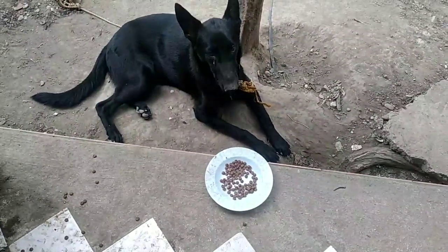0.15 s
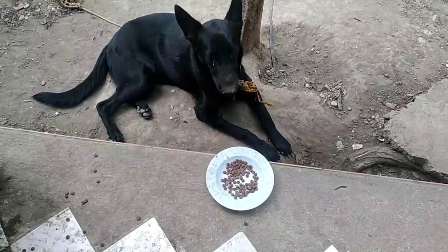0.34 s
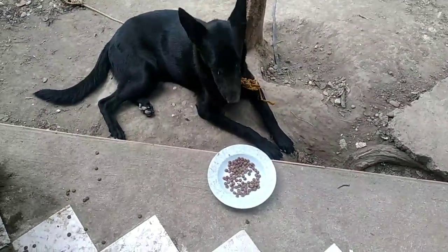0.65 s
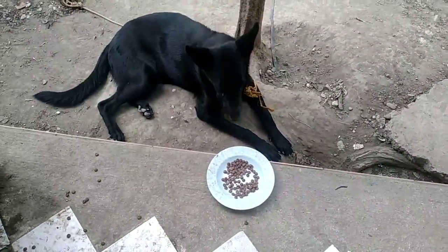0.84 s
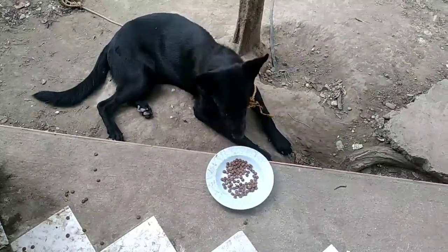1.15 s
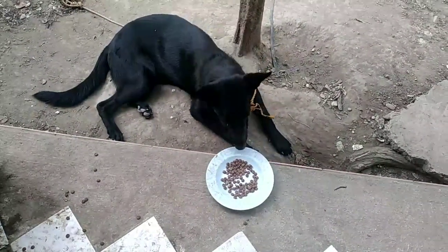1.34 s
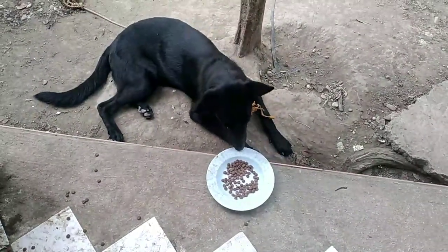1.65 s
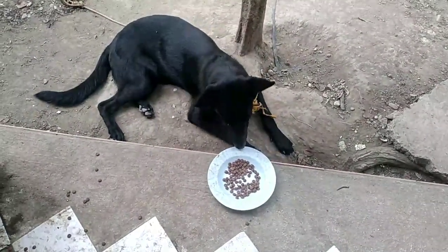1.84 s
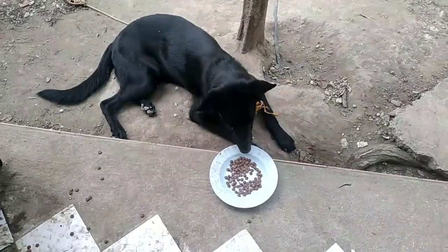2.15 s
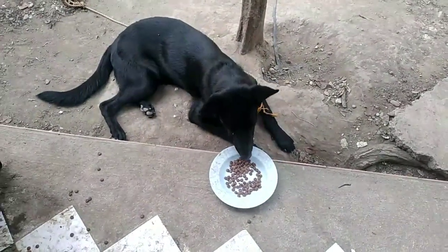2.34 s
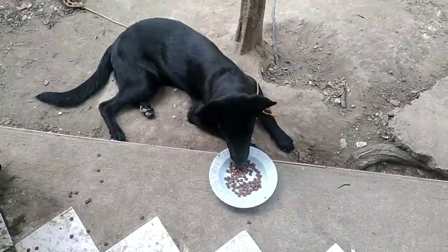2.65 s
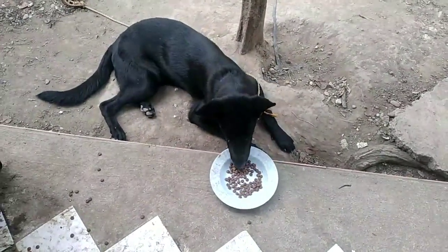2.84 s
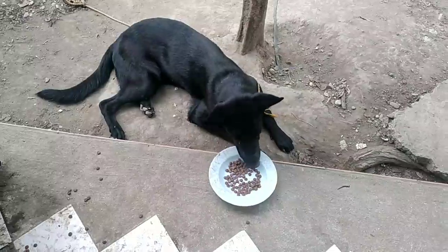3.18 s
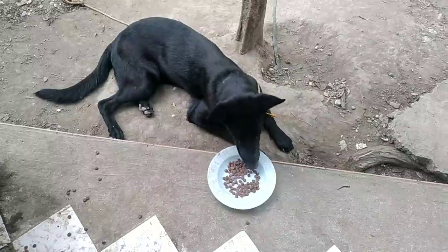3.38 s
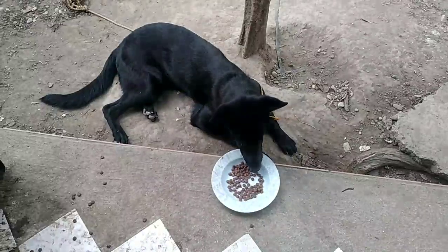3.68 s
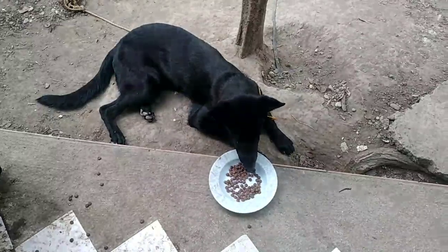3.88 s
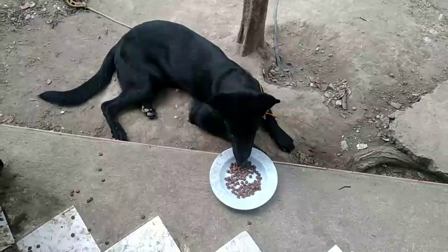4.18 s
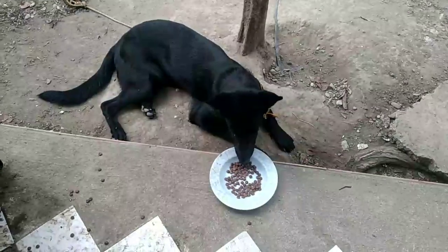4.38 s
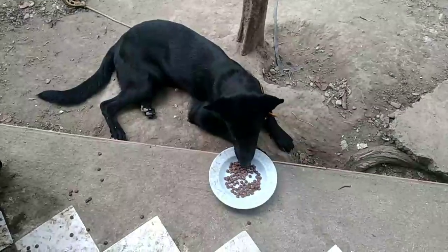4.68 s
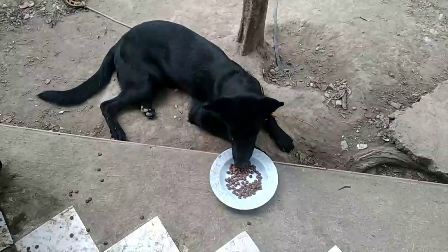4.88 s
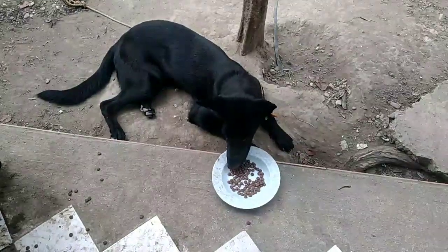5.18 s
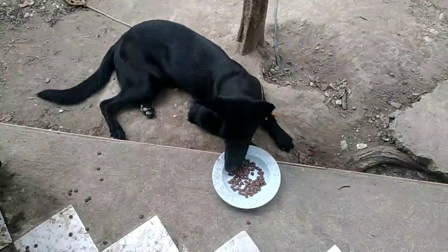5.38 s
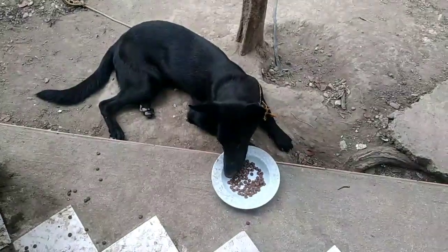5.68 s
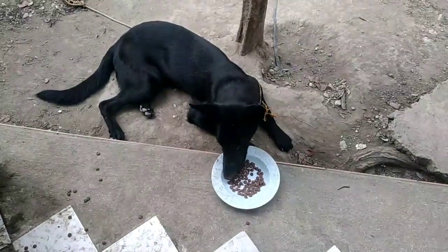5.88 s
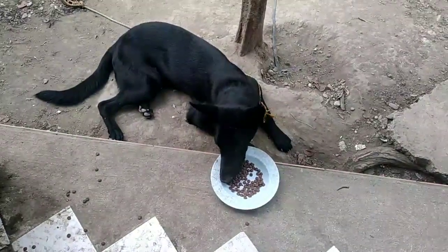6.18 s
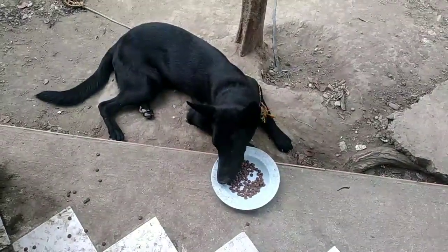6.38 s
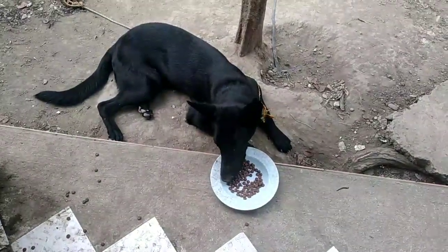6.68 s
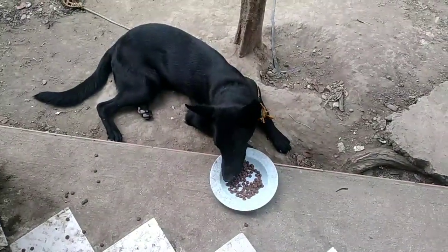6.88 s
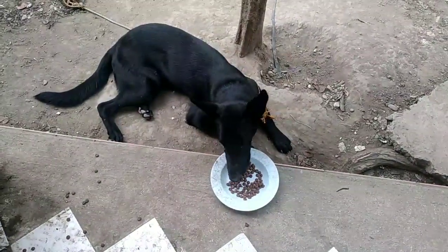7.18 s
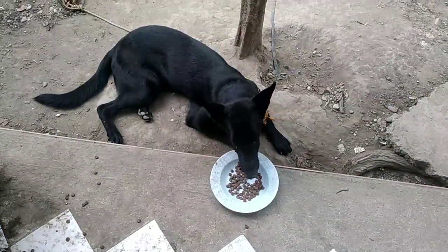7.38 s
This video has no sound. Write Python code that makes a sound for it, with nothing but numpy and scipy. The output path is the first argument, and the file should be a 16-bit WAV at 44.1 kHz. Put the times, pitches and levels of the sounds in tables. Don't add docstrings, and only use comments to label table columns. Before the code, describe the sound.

A dog cracks dry kibble off a thin plate outdoors, sharp crunches in bursts, with collar tinkles, a few bird chirps and faint town rumble.

```python
import sys
import numpy as np
from scipy import signal
from scipy.fft import rfft, irfft
from scipy.io import wavfile
from scipy.ndimage import uniform_filter1d

SR = 44100
rng = np.random.default_rng(int(sys.argv[2]) if len(sys.argv) > 2 else 0)


def voltage_ratio(level):
    return 10 ** (np.asarray(level, float) / 20)


def output_pcm(signal):
    pcm = np.clip(np.atleast_2d(signal).T, -1, 1) * 32767
    wavfile.write(sys.argv[1], SR, np.round(pcm).astype(np.int16))


N = 332073
T = np.arange(N) / SR

# f/Hz, level/dB
TOWN = [(12, -27.5), (20, -22), (30, -9), (43, -2.5), (65, -1.5), (124, -5), (185, -12.5), (209, -18.5),
        (339, -17), (376, -18.5), (464, -26), (505, -26), (889, -27.5), (1500, -36), (2480, -38),
        (3000, -44), (3900, -62), (6600, -120)]
# t/s, level/dB, revs/dB (moved from the deep note to the upper one)
ENGINES = [(0.05, -58, 7.5), (0.69, -54, 1), (1.34, -52.5, -0.5), (1.74, -60.5, 2), (2.29, -52.5, 0.5),
           (2.93, -54, 0), (3.19, -57, 7), (3.33, -56.5, -1), (3.94, -48.5, -1), (4.21, -54, 2),
           (4.55, -54.5, -6), (4.7, -52, 5.5), (5.16, -52.5, -8), (5.6, -55, -0.5), (6.69, -54.5, 0.5),
           (7.34, -57.5, 1), (7.53, -59, -9.5)]
# f/Hz, level/dB
AIR = [(800, 9.5), (2000, -8), (5000, 1.5), (9000, 0), (12000, 12.5), (16500, -5)]
# t/s, length/s, fall/Hz, level/dB, fade over the length/dB
FAR = [(0.028, 0.22, 9, -70.5, 6), (1.58, 0.54, -30, -81, -7), (1.861, 0.34, 130, -72.5, 8),
       (2.343, 0.17, 77, -73, 7), (5.493, 0.33, 56, -78.5, 5), (6.777, 0.032, 20, -60.5, 5),
       (6.807, 0.044, 2, -52.5, 0), (6.884, 0.035, 5, -59, 3), (6.924, 0.047, 5, -65.5, 5),
       (7.024, 0.081, 7, -61, -13), (7.08, 0.065, 30, -70, 9), (7.147, .15, 28, -78, 9),
       (7.353, 0.16, 9.5, -56, 7), (6.81, 0.099, 7, -71, 9), (7.001, 0.1, 5, -70, 3),
       (7.107, 0.032, -10, -56.5, 3), (6.783, 0.018, 5, -64, 3), (7.09, 0.038, 5, -62.5, 7),
       (7.176, .05, 30, -66, 5), (6.85, .03, 5, -64, 3), (6.855, .06, 5, -67, 3)]
FAR_HZ = [1780, 2700, 4520, 7250, 4330, 995, 1427, 1427, 1427, 697, 7800, 4350, 350, 2864, 1430, 700, 1350,
          1330, 745, 1430, 990]
# peak t/s, rise/s, fall/s, level/dB, relative treble/dB
SHUFFLES = [(.19, 0.014, .08, -70.5, 8.5), (1.35, 0.16, 0.12, -67, 10), (2.44, 0.27, 0.049, -67, 7.5),
            (3.288, 0.017, 0.064, -64, 9.5), (4.29, 0.054, .12, -66.5, -2), (4.69, .06, 0.12, -67, -2),
            (4.98, .04, 0.044, -68, 8.5), (5.046, 0.024, 0.059, -68, 10), (5.83, .04, .022, -64.5, -1),
            (5.96, 0.073, 0.11, -64.5, 5.5), (6.134, 0.012, 0.12, -58, 5), (6.699, 0.088, 0.039, -58, 7.5),
            (6.785, 0.14, 0.021, -64.5, 6), (6.994, 0.3, 0.077, -65, 4), (7.085, 0.048, 0.068, -62, -17),
            (7.122, 0.03, 0.062, -60, 6.5), (7.255, 0.071, 0.05, -55, 6)]
# f/Hz, level/dB
RUSTLE = [(2500, -27), (3500, -15.5), (4500, -6), (6000, -10), (8000, -9), (11000, -8), (14000, -3.5),
          (16500, -33)]
# t/s, peak level/dB, relative treble/dB
TICKS = [(0.293, -53, 9), (1.02, -50.5, 9), (3.273, -44.5, -10), (3.291, -52, 15), (3.422, -48.5, 2.5),
         (3.8972, -50, 4), (3.905, -53, 11), (5.0433, -51, 10), (5.049, -56, 10), (5.111, -57, 9),
         (5.425, -57, 17), (6.013, -44.5, -11), (6.171, -50, 11), (6.242, -43, -13), (6.3073, -43, -8),
         (6.662, -53, 4), (6.681, -52, 5), (6.703, -51, 5), (6.718, -50, 4), (6.581, -49, 6),
         (6.989, -44, 1), (7.3019, -39, -13)]
# peak t/s, rise/s, fall/s, level/dB, relative treble/dB
NIBBLES = [
    (1.95, 0.18, 0.29, -63, -3),
    (5.443, 0.008, 0.051, -48, -8),
    (6.166, 0.0033, 0.1, -56, 6.5),
    (6.327, 0.036, 0.062, -59.5, 9.5),
    (7.304, 0.002, 0.01, -52.5, -17),
    (7.314, 0.004, 0.043, -51, -10),
    (7.389, 0.0036, 0.029, -55.5, -4),
    (7.403, .008, 0.017, -53.5, -12),
    (7.452, 0.029, 0.12, -62, -6),
]
# t/s, peak level/dB, relative treble/dB, f/Hz
CRACKS = [(2.6103, -16.5, -14.5, 1570), (2.6163, -17, -23, 1710), (2.623, -33, -12, 1550),
          (2.63, -24, -7, 1760), (2.637, -27, 1, 1780), (2.642, -33.5, -2, 2000), (2.6466, -37, -9.5, 1810),
          (2.6509, -39, -3.5, 1710), (2.8666, -15, -2.5, 1620), (2.8682, -11.5, -3.5, 1970),
          (2.8753, -13.5, -17, 1760), (2.8873, -22, -11, 1790), (2.8912, -14, -10, 1890),
          (2.896, -27, -7, 1870), (2.9014, -23, 0, 2020), (2.9057, -22, -3, 1830), (3.1259, -16, 1.5, 1830),
          (3.1327, -18.5, -3.5, 1790), (3.139, -18, -7, 1710), (3.1494, -14.5, -1, 1820),
          (3.1559, -20.5, 0, 2010), (3.1594, -22, -1, 2050), (3.5234, -9.5, 1.5, 1750),
          (3.5257, -15, -2, 2310), (3.5313, -15, -5, 1800), (3.538, -13.5, -6.5, 1400),
          (3.544, -16.5, -8, 1500), (3.548, -21, -10, 1200), (3.551, -28, 7, 1280), (3.556, -22, -7, 1720),
          (3.565, -32, -3, 1980), (3.571, -31, -14, 2050), (3.5745, -27, -12, 1880),
          (3.582, -23, -12, 2020), (3.5967, -30, -9, 1980), (5.2091, -15, -9.5, 1730),
          (5.217, -18.5, -20, 1740), (5.222, -17, -18, 1780), (5.2311, -18, 0, 2490),
          (5.239, -32, -4, 1890), (5.2437, -31, -7, 2080), (5.251, -27, 4, 1930), (5.2582, -29, -8, 1910)]
# t/s, peak level/dB, relative treble/dB, f/Hz
NIPS = [(5.1854, -49, 1, 1390), (5.1927, -39.5, 7, 2040), (5.4394, -36, -10, 1830),
        (5.4479, -33, -20, 1580), (5.459, -36, -3, 1870), (6.13, -39, -15, 1530), (6.1348, -40, -9, 1730),
        (6.1656, -38, 7, 2000), (6.171, -46, 2, 1900), (6.1976, -53, 7, 2000), (6.308, -43, -11, 1740),
        (6.3234, -34, 0.5, 2180), (6.3317, -40, -8, 2230), (6.3412, -37, -9, 2170),
        (7.3032, -37, -19, 1420), (7.3105, -30, -17, 1290), (7.3142, -39, -18, 2230),
        (7.3193, -39, -16, 1900), (7.338, -45.5, 4, 1770), (7.3883, -41, -13, 1560), (7.395, -48, -6, 1980),
        (7.4024, -48, -11, 1540), (7.4114, -42, -2, 1480), (7.415, -53, -8, 1700), (7.4407, -42, -4, 1480),
        (7.45, -37, -15, 1460), (7.4547, -53, -10, 1590), (7.4578, -50, -12, 1760)]
# t/s, break level/dB, crush delay/s, crush level/dB, 20 dB crush fade/s
BITES = [
    (2.612, -27.5, 0.017, -48, 0.09),
    (2.869, -28, 0.02, -34, 0.09),
    (3.127, -27.5, 0.0099, -45.5, 0.2),
    (3.527, -29.5, 0.049, -31.5, 0.06),
    (5.21, -32.5, 0.031, -36, 0.05),
]
BITE_KNOCK_DB = [-2, -4.5, -1.5, -4.5, 0]
CRUSH_RISE = [1.4, 3.5, 7.5, 0.54]
# t/s, peak level/dB, f/Hz
PINGS = [(2.6105, -35.5, 4630), (2.6203, -44, 4500), (2.6273, -46, 4660), (2.6335, -44, 4500),
         (2.636, -34, 4700), (2.8674, -23.5, 4500), (2.8765, -30, 4800), (2.8918, -29, 4540),
         (2.8984, -33, 4760), (2.9035, -30, 4530), (3.127, -26, 4560), (3.141, -35, 4500),
         (3.149, -34, 4530), (3.158, -34, 4700), (3.5251, -24, 4840), (3.559, -29, 4530),
         (3.568, -30, 4570), (3.5745, -36, 4430), (3.579, -23.5, 4520), (3.5863, -33, 4580),
         (5.1927, -62, 4720), (5.2092, -29.5, 4510), (5.2315, -24, 4550), (5.248, -35, 4400),
         (5.442, -53, 4640), (5.45, -48, 4600), (5.4599, -52, 4590), (6.1661, -36, 4500),
         (6.173, -36.5, 4590), (6.1972, -47, 4570), (6.3071, -60, 4570), (6.3135, -60, 4830),
         (6.3237, -49, 4870), (6.3299, -57, 4470), (6.3341, -56, 4890), (6.3379, -57, 4720),
         (6.343, -58, 4340), (6.349, -59, 4590), (7.304, -49, 4660), (7.3104, -47, 4530),
         (7.3143, -46, 4470), (7.3177, -48, 4650), (7.3265, -54, 4560), (7.331, -56, 4490),
         (7.3887, -49, 4900), (7.3957, -54, 4740), (7.4002, -53, 4570), (7.4033, -56, 4420),
         (7.4409, -57, 4570), (7.4439, -66, 4880), (7.4484, -59, 4560), (7.4565, -58, 4610),
         (7.4599, -67, 4800), (5.0437, -53, 7700), (7.354, -62, 7200), (7.365, -61, 7200),
         (3.526, -28, 5850), (3.5325, -34, 7140)]
# f/Hz, level/dB, t60/s
PLATE_MODES = [(1060, 0.5, .08), (1468, -6, .05), (1587, -7, .05), (1740, 0, .08), (1897, -4, .08),
               (2051, -9, .04), (2186, -9, .04), (2452, -8, .06)]
# f/Hz, level/dB
BODY = [(500, -35.5), (850, -12.5), (1100, -2), (1500, -4.5), (1800, -2), (2300, -4.5), (2650, -5.5),
        (3000, -14), (4000, -31)]
# f/Hz, level/dB
BRITTLE = [(2500, -15.5), (3300, -6), (4100, -5), (4550, -6), (5500, -2), (6500, -4.5), (8000, -5),
           (10000, -5.5), (13000, -2.5), (16500, -24)]
# f/Hz, level/dB
THUD = [(120, -20), (250, -5.5), (350, -2.5), (550, -3), (750, -8), (1100, -26.5)]
# f/Hz, left minus right level/dB
LEAN = [(650, -0.5), (950, -6.5), (1250, 0), (1700, 3.5), (2300, -7.5), (2900, -3), (4400, 4.5), (6500, 0),
        (9000, -2.1)]
# t/s, peak level/dB, loudest partial f/Hz
TINKLES = [(0.525, -53.5, 10800), (1.67, -45, 10300), (2.01, -43, 10300), (2.149, -42.5, 10800),
           (2.165, -45, 10500), (2.3437, -56, 10700), (4.6004, -34.5, 9650), (4.924, -56, 10300),
           (5.0312, -53, 10300), (5.044, -49, 10800), (5.05, -36, 12650), (6.888, -59, 10300)]
# f/Hz, level/dB, t60/s
RING = [(10380, 5.5, 0.22), (10500, 6, 0.13), (10300, -23, 0.39), (10700, -32, 0.24), (11200, -16, 0.62),
        (10800, 3, 0.25), (12650, 3, .04)]
# t/s, peak level/dB of its low, middle and upper tone
PLATE_BLOWS = [
    (2.611, -52, -50, -50),
    (2.869, -37, -32.5, -38),
    (3.128, -46, -32, -40),
    (3.526, -34, -29, -40),
    (3.539, -31, -38, -42),
    (3.58, -52, -44, -36),
    (5.21, -44, -36, -40),
]
# f/Hz, t60/s
PLATE_TONES = [(1057, .085), (1739, .07), (1896, .11)]
# t from its start/s, f/Hz, warble depth/Hz
CHIRP = [(0, 6150, 200), (.012, 6550, 450), (.029, 6650, 500), (.036, 5600, 800), (.06, 5350, 800),
         (.085, 5050, 830), (.11, 4600, 700), (.15, 4250, 550)]
# start t/s, stretch/1, pitch factor/1, octave level/dB, level/dB
CHIRP_STARTS = [
    (2.714, 1.0, 1.02, -11, -46.5),
    (2.962, 1.12, 1.035, -12, -42.5),
    (3.934, 1.0, 1.0, -2, -50),
    (5.546, 1.03, 0.99, -18, -62),
]
CHIRP_TILT = [.8, 2.2, 0, .8]
# f/Hz, level/dB
LEFT_PORT = [(300, -1.14), (2500, 0), (3600, 5), (4600, 3.5), (5500, 2.5), (6300, 6), (7100, 8),
             (7700, 8.5), (8600, -2), (9600, -14.5), (11000, -12), (12500, -26.5), (15000, -5.5)]
# f/Hz, level/dB
RIGHT_PORT = [(300, -2.5), (2400, 0), (3400, 0.5), (5500, -4.5), (7500, -12.5), (8600, 0.5), (9300, 3),
              (10250, 3), (10700, 1.5), (11250, -1), (11800, -11.5), (13000, -10), (15000, -6.5)]


def level(x, db):
    return x * voltage_ratio(db) / np.sqrt(np.mean(x ** 2))


def colour(x, points):
    hz, db = np.transpose(points)
    size = 4096
    bin_hz = np.arange(size // 2 + 1) * SR / size
    log_gain = np.interp(np.log(bin_hz + 1), np.log(hz), db) * np.log(10) / 20
    cep = irfft(log_gain)
    cep[1:size // 2] *= 2
    cep[size // 2 + 1:] = 0
    response = irfft(np.exp(rfft(cep)))
    return signal.oaconvolve(x, response.reshape((1,) * (x.ndim - 1) + (-1,)), axes=-1)[..., :N]


def unit(points):
    click = colour(np.eye(1, 8192)[0], points)
    return np.array(points) - [0, 10 * np.log10(np.sum(click ** 2))]


def walk(rate_hz):
    k = int(SR / rate_hz)
    steps = np.repeat(rng.standard_normal(N // k + 1), k)
    return 1.27 * uniform_filter1d(uniform_filter1d(steps, k), k)[:N]


def pair(likeness):
    mid, side = rng.standard_normal((2, N))
    c = np.clip(likeness, 0, 1)
    return np.sqrt((1 + c) / 2) * mid + np.sqrt((1 - c) / 2) * side * np.array([[1], [-1]])


def yard(x, t60, wet_db, gap_s):
    t = np.arange(SR // 2) / SR
    tail = rng.standard_normal((2, len(t))) * np.exp(-t * np.log(1000) / t60) * (t > gap_s)
    tail *= voltage_ratio(wet_db) / np.sqrt(np.sum(tail ** 2, axis=1, keepdims=True))
    return x + signal.fftconvolve(x * np.ones((2, 1)), tail, axes=1)[:, :N]


def mode(x, hz, t60):
    r = np.exp(-np.log(1000) / (t60 * SR))
    w = 2 * np.pi * hz / SR
    return signal.lfilter([0, r * np.sin(w)], [1, -2 * r * np.cos(w), r * r], x)


def strike(times, gains, hz, t60):
    blows = np.zeros(N)
    np.add.at(blows, (times * SR).astype(int), gains)
    return mode(blows, hz, t60)


def add(out, s, rise_s, fall_s, db, bend, lead_s=.4):
    rise_s, fall_s, db = (np.reshape(v, (-1, 1)) for v in (rise_s, fall_s, db))
    span = slice(max(int((s - lead_s) * SR), 0), int((s + 3 * fall_s.max()) * SR))
    age = T[span] - s
    out[:, span] += voltage_ratio(db - 20 * (np.abs(age) / np.where(age < 0, rise_s, fall_s)) ** bend)


def town():
    near, apart = pair(.993), pair(.05)
    shared = signal.sosfiltfilt(signal.butter(2, 750, fs=SR, output="sos"), near - apart)
    rumble = level(colour(apart + shared, TOWN), -49.5) * voltage_ratio([[.15], [-.15]])
    rumble[0] = np.roll(rumble[0], shift=-9)
    s, both_db, revs = np.transpose(ENGINES)
    for db, band in zip((both_db - revs, both_db + revs), ([45, 90], [90, 140])):
        part = signal.sosfiltfilt(signal.butter(2, band, "band", fs=SR, output="sos"), rumble)
        swell = voltage_ratio(np.interp(T, s, db)) / np.sqrt(np.mean(part ** 2))
        rumble = rumble + part * (swell - 1)
    insect_hz, insect_width_hz, insect_db = 10300, 129, -79
    insects = level(mode(apart, insect_hz, 2.2 / insect_width_hz), insect_db) * voltage_ratio(1.8 * walk(2.5))
    air = level(colour(pair(.02), AIR), -62.5) * voltage_ratio(.5 * walk(3))
    return rumble + insects + air


def far_calls():
    out = np.zeros(N)
    flutter, drift = walk(40), np.cumsum(walk(60)) / SR
    for (s, length, fall_hz, db, fade_db), hz in zip(FAR, FAR_HZ):
        t = T - s
        flutter_db, waver_hz = (6, 36) if hz > 1500 else (2.6, 11)
        shape = np.clip(np.minimum(t, length - t) / (0.15 * length), 0, 1)
        phase = hz * t + waver_hz * drift - fall_hz * t * t / (2 * length)
        loudness = voltage_ratio(db + flutter_db * flutter - fade_db * np.clip(t / length - .3, 0, 1))
        out += loudness * shape * np.sin(2 * np.pi * phase)
    return yard(out, t60=.28, wet_db=-8, gap_s=.01)


def spurts():
    return voltage_ratio(2.0 * walk(500) + 0.4 * walk(120) - 4.0)


def chewing():
    jaw, muzzle = np.zeros((4, N)), np.zeros((2, N))
    soft_bend = 1.33
    for s, rise_s, fall_s, db, top in SHUFFLES:
        add(muzzle, s, rise_s, fall_s, [db, db + top], soft_bend)
    # relative dB, and how long each lingers
    break_layers_db, crush_layers_db = [-6, -15.5, -11.5, -16], [-5.5, -2.5, -11.5, -2]
    bite_linger, nibble_linger = np.array([1.07, 1.19, 1.36, 0.51]), np.array([0.84, 1.1, 0.64, 0.36])
    break_rise_s, break_fall_s = 0.0021, 0.021
    for (s, break_db, after_s, crush_db, fall_s), knock_db in zip(BITES, BITE_KNOCK_DB):
        press = np.array([0, 0, knock_db, 0])
        add(jaw, s, break_rise_s, break_fall_s, break_db + press + break_layers_db, 1, 2 * break_rise_s)
        add(jaw, s + after_s, after_s * np.array(CRUSH_RISE), fall_s * bite_linger,
            crush_db + press + crush_layers_db, 1, after_s)
    for s, rise_s, fall_s, db, top in NIBBLES:
        knock_db = -5 - 0.94 * max(top, -12)
        rim_db = 4 - 400 * rise_s
        add(jaw, s, rise_s, fall_s * nibble_linger, db + np.array([0, top, knock_db, rim_db]), soft_bend)
    return *jaw, *muzzle


def snapping():
    ticks = [(s, db, top, 1590 + 80 * (db + 50.5)) for s, db, top in TICKS]
    s, db, rel, snap_hz = np.transpose(CRACKS + NIPS + ticks)
    snaps = np.zeros((3, N))
    t = np.arange(600) / SR
    rise_s, fade_s = 0.00078, 0.0023
    fade = np.minimum(t / rise_s, 1) * np.exp(-t / fade_s)
    for i, g, top, hz in zip((s * SR).astype(int), voltage_ratio(db), voltage_ratio(rel), snap_hz):
        body, brittle = np.full(len(t), voltage_ratio(-13.0)), np.full(len(t), voltage_ratio(-10.5) * top)
        pitch = voltage_ratio(-9.0) * np.sin(2 * np.pi * hz * t)
        snaps[:, i:i + len(t)] += g * fade * [body, brittle, pitch]
    return snaps


def crumb_pings():
    ping = np.zeros(N)
    t = np.arange(600) / SR
    fade = np.minimum(t / 0.00068, 1) * np.exp(-t / 0.0018)
    for s, db, hz in PINGS:
        i = int(s * SR)
        ping[i:i + len(t)] += voltage_ratio(db + 2) * fade * np.sin(2 * np.pi * hz * t)
    return ping * voltage_ratio([[3], [-5]])


def kibble():
    body, top, pitch = snapping()
    grind, crisp, knock, scrape, push, brush = chewing()
    shake = (body + spurts() * grind) * pair(0.51)
    sound = colour(shake, unit(BODY)) + pitch
    sound += sum(voltage_ratio(db - 29.5) * mode(shake, hz, t60) for hz, db, t60 in PLATE_MODES)
    sound += colour(spurts() * push * pair(0.71), unit(np.array(BODY) * [1.18, 1]))
    brittle = (top + spurts() * crisp) * pair(0.5)
    sound += colour(brittle, unit(BRITTLE))
    sound += voltage_ratio(-30) * mode(brittle, hz=7300, t60=0.011)
    rim = voltage_ratio(-17.0) * top + spurts() * scrape
    sound += voltage_ratio(-11.0) * mode(rim * pair(0.98), hz=4560, t60=.009) * voltage_ratio([[2.5], [-2.5]])
    sound += colour((voltage_ratio(-11) * body + knock) * pair(0.96), unit(THUD))
    sound += colour(spurts() * brush * pair(0.092), unit(RUSTLE))
    left = colour(sound[0], np.array(LEAN) * [1, .5])
    right = colour(np.roll(sound[1], shift=2), np.array(LEAN) * [1, -.5])
    return yard(np.array([left, right]), t60=.2, wet_db=-12, gap_s=.009) + crumb_pings()


def collar():
    s, db, near_hz = np.transpose(TINKLES)
    luck = rng.standard_normal((len(s), len(RING)))
    ring = np.zeros(N)
    for k, (hz, g, t60) in enumerate(RING):
        touch_db = db + .5 * g + 0.84 * luck[:, k] - np.abs(hz - near_hz) / 45
        ring += strike(s, voltage_ratio(touch_db), hz, 0.35 * t60)
    return yard(ring * voltage_ratio([[-4], [-1.5]]), t60=0.26, wet_db=-1.5, gap_s=0.00296)


def plate():
    s, *db = np.transpose(PLATE_BLOWS)
    tones = sum(strike(s, voltage_ratio(d), hz, t60) for d, (hz, t60) in zip(db, PLATE_TONES))
    return tones * voltage_ratio([[1], [-1]])


def bird():
    age, hz, depth = np.transpose(CHIRP)
    pitch, octave, effort, weaken = np.zeros((4, N))
    falls_s = [.17, .115, .12, .13]
    for (s, stretch, factor, octave_db, db), fall_s, tilt in zip(CHIRP_STARTS, falls_s, CHIRP_TILT):
        peak_s = 0.025 * stretch
        add(effort[None], s + peak_s, .03, fall_s, db, 1.4, peak_s)
        t = (T - s) / stretch
        buzz = np.cos(2 * np.pi * 170 * (t - .031))
        dips = 1 - 2 * np.abs(np.sin(np.pi * 51 * (t - .031))) ** .7
        warble = np.where(t < .031, buzz, dips)
        glide = factor * (np.interp(t, age, hz) + np.interp(t, age, depth) * warble)
        pitch = np.where(t > -.02, glide, pitch)
        octave[t > -.02], weaken[t > -.02] = voltage_ratio(octave_db), tilt
    phase = 2 * np.pi * np.cumsum(pitch + 80 * walk(600)) / SR
    voice = np.sin(phase) * voltage_ratio([[1.5], [-1.5]])
    voice += octave * (pitch / 6500) ** 2.5 * np.sin(2 * phase) * voltage_ratio([[-3], [3]])
    voice *= effort * (pitch / 6200) ** weaken * voltage_ratio(2.5 * walk(200) - 4.5)
    return yard(voice, t60=.26, wet_db=3, gap_s=.002)


def scene():
    return town() + far_calls() + kibble() + collar() + plate() + bird()


def roll_off(x):
    return signal.sosfilt(signal.butter(12, 15240, fs=SR, output="sos"), x)


def record(dry):
    x = np.array([colour(dry[0], LEFT_PORT), colour(dry[1], RIGHT_PORT)])
    x = signal.sosfilt(signal.butter(10, 16050, fs=SR, output="sos"), x)
    return roll_off(x)


dry = scene()
out = record(dry)
output_pcm(out)
```